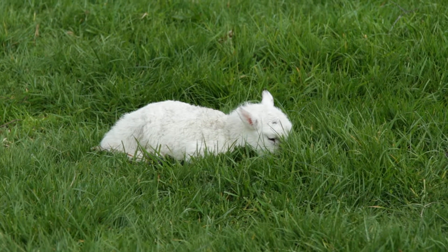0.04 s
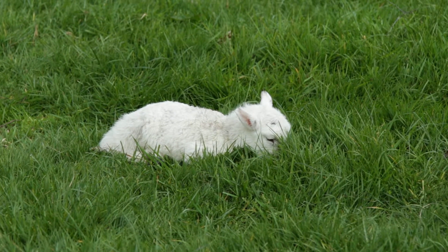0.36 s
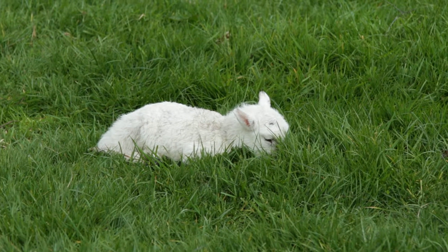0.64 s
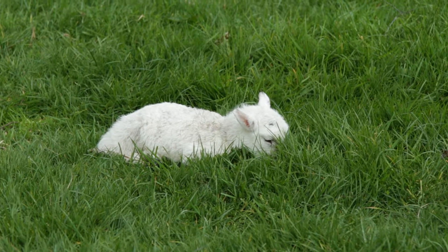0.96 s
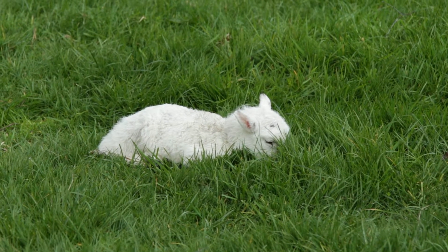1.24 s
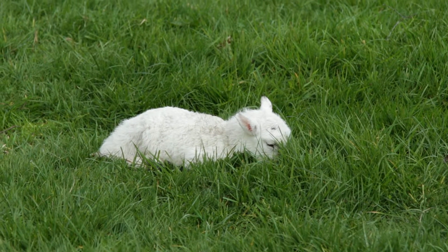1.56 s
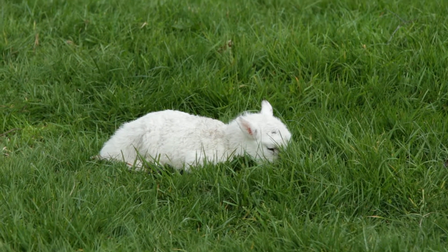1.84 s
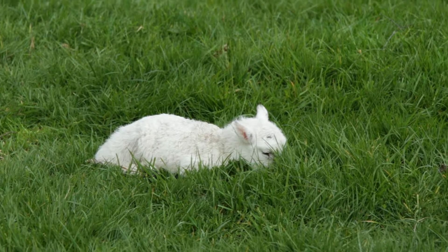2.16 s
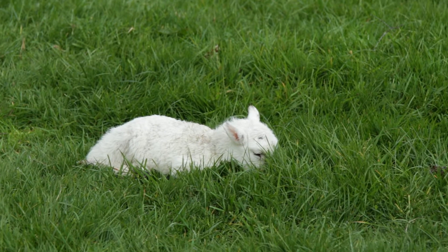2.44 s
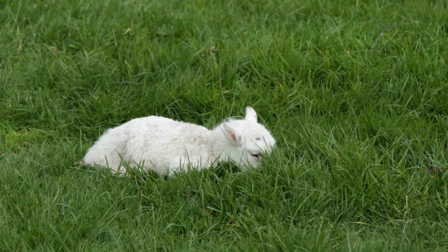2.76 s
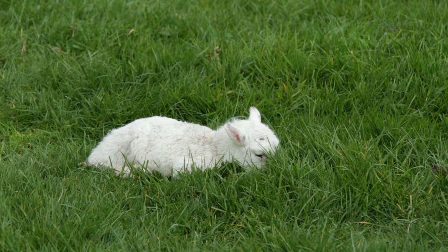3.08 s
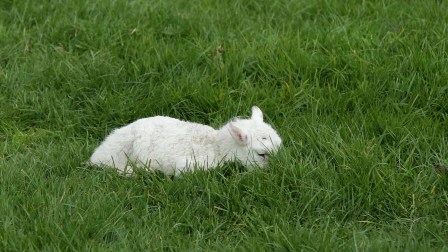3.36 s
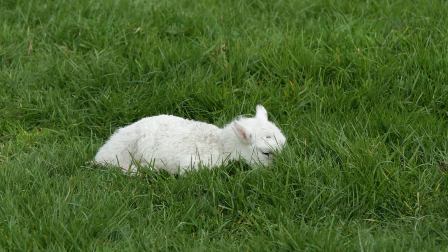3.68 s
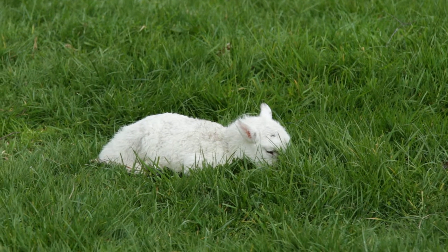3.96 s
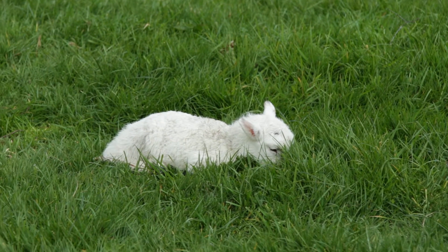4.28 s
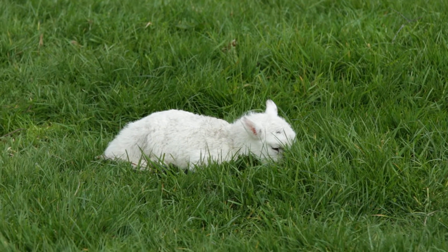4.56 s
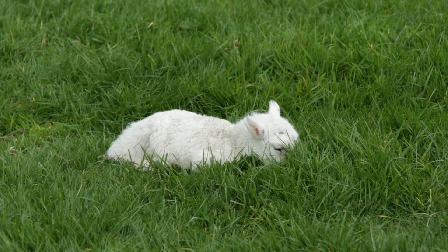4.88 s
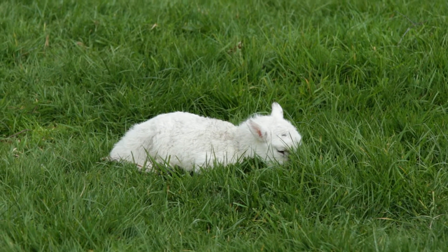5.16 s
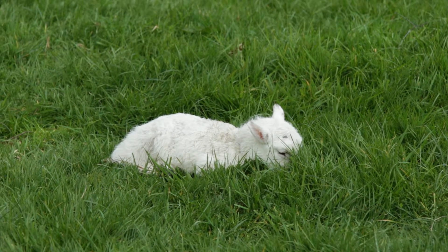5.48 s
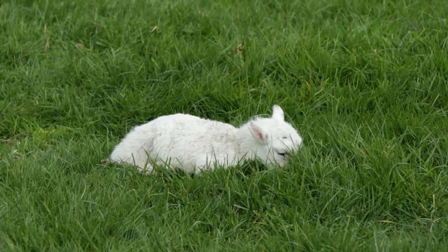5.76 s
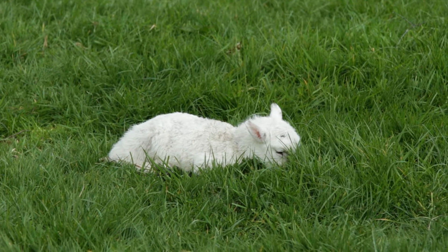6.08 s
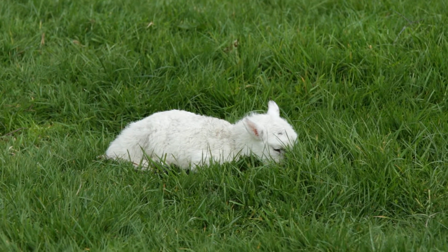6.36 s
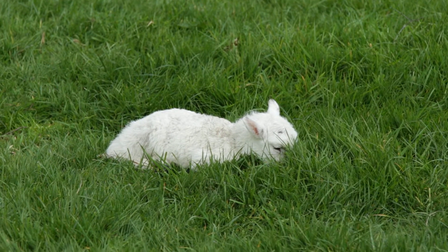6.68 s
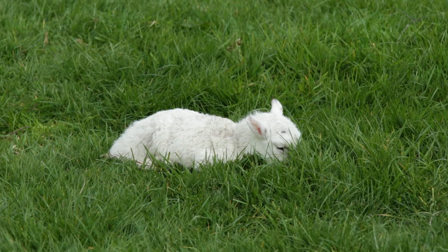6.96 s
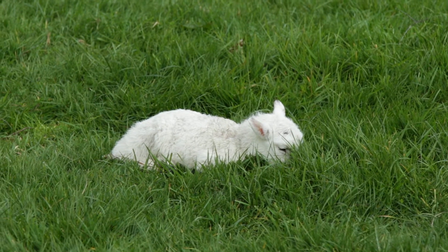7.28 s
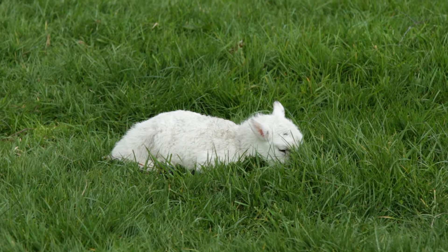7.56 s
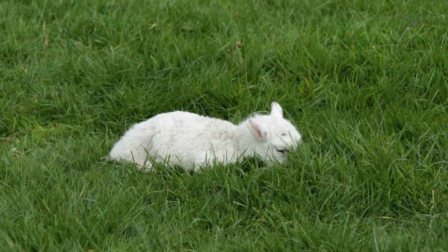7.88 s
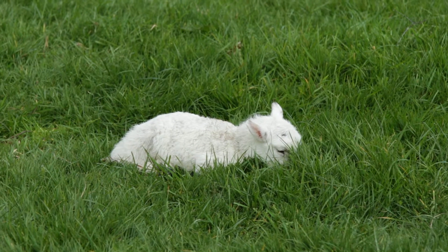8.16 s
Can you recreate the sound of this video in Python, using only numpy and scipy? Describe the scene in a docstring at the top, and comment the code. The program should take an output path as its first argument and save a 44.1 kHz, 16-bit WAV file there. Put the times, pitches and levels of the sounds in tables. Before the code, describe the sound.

A faint, steady outdoor rush lies under a quiet pasture throughout. Small birds chirp softly from about 0.5 to 1.5 seconds, and there is one soft knock at 1.1 seconds. From 1.3 to 2.1 seconds a nearby lamb gives a thin, rising call. A ewe close by overlaps its end with a loud, low, buzzing bleat from 1.8 to 2.9 seconds, starting as a hum, opening up, then falling with a quaver. A far lamb answers faintly around 2.8 seconds. A very distant sheep is barely audible around 4.5 seconds, and another far lamb calls from 4.7 to 5.4 seconds. The ewe gives her second loud, low bleat from 5.5 to 6.4 seconds, followed by a few small, high bird chirps until about 7.3 seconds. A last faint, trembling lamb call carries across the field from 7.6 to 8.3 seconds.

```python
"""A quiet pasture. A ewe close by gives two low, buzzing bleats; a lamb calls just before the first,
and other lambs answer from far across the field. Each of these voices is a source and a filter: the
vocal folds snap shut once a cycle, and every pulse rings in the resonances of the throat.
Small birds chirp in gliding tones, a very distant sheep carries as one partial, and there is one soft
knock. Ground and hedges scatter the sounds, and a faint outdoor rush lies under it all."""
import sys
import numpy as np
from scipy import signal
from scipy.fft import rfft, irfft, next_fast_len
from scipy.io import wavfile

SR = 44100
rng = np.random.default_rng(int(sys.argv[2]) if len(sys.argv) > 2 else 0)


def transcribe(u):
    """Save the signal u as a 16-bit wav file named by the first command-line argument.

    u: samples, shape (n,) or (channels, n), limited to [-1, 1]; the rate is SR.
    q: integer samples, one column per channel.
    """
    v = np.clip(np.atleast_2d(u).T, -1, 1)
    q = np.round(v * 32767).astype(np.int16)
    wavfile.write(sys.argv[1], SR, q)


N = 371763
TIME = np.arange(N) / SR
RING = 2048   # samples that one pulse rings for
PULSE_HZ = np.maximum(np.arange(RING // 2 + 1) * SR / RING, 1)
CONTROL_HZ = 1000   # control points per second of a call


def from_db(db):
    """Amplitude ratio: tenfold for every 20 dB."""
    return 10 ** (np.asarray(db) / 20)


def at_hz(spectrum, hz):
    """Interpolation of a spectrum on a log-frequency axis."""
    knots_hz, db = np.transpose(spectrum)
    return np.interp(np.log(np.maximum(hz, 1)), np.log(knots_hz), db)


def at_times(rows, times):
    """Linear interpolation of every column of a curve in time."""
    knots_s, *columns = np.transpose(rows)
    return [np.interp(times, knots_s, column) for column in columns]


def wander(times, count=80):
    """Slow random modulation with a spread of about 1."""
    return np.interp(times, np.linspace(0, N / SR, count), rng.standard_normal(count))


def bump(t, centre, half_width):
    """Gaussian window: a smooth rise to 1 and back."""
    return np.exp(-((t - centre) / half_width) ** 2)


def swell(t, attack_s, release_s):
    """Amplitude envelope in dB: attack, hold and release."""
    rise, fall = np.clip((t - t[0]) / attack_s, 0, 1), np.clip((t[-1] - t) / release_s, 0, 1)
    return 20 * np.log10(np.maximum(rise * fall, .02))


def noise(spectrum):
    """Spectral shaping of white noise, to an rms of 1."""
    size = next_fast_len(N)
    gain = from_db(at_hz(spectrum, np.fft.rfftfreq(size, 1 / SR)))
    coloured = irfft(rfft(rng.standard_normal(size)) * gain, size)[:N]
    return coloured / coloured.std()


# spectrum of the rush: (frequency [Hz], relative density [dB])
RUSH_SPECTRUM = [(20, -6.5), (36, 0), (60, -12.5), (82, 1), (105, -9), (165, -2), (205, -10), (450, -13.5),
                 (800, -13), (1600, -13), (2700, -19.5), (4500, -25), (8000, -35), (15000, -34.5)]


def outdoor_rush():
    """Stationary broadband noise, strongest in the bass."""
    return from_db(-69.5) * noise(RUSH_SPECTRUM)


def scatter(direct, t60, dull_hz):
    """Diffuse reflection from ground and hedges: an exponential tail, duller than the direct sound."""
    age = np.arange(SR) / SR
    tail = rng.standard_normal(SR) * from_db(-60 * age / t60) * (age > .004)
    lowpass = signal.butter(1, dull_hz, fs=SR, output="sos")
    return signal.fftconvolve(direct, signal.sosfilt(lowpass, tail / np.linalg.norm(tail)))[:N]


# a very distant sheep's strongest partial: (time [s], frequency [Hz], level [dB])
DISTANT_PARTIAL = [(4.2, 700, -95), (4.3, 711, -81), (4.5, 717, -91), (4.66, 715, -75.5), (4.75, 698, -98)]


def distant_sheep():
    """Attenuation with distance: only the strongest partial carries above the rush."""
    hz, db = at_times(DISTANT_PARTIAL, TIME)
    sounding = (TIME > DISTANT_PARTIAL[0][0]) & (TIME < DISTANT_PARTIAL[-1][0])
    return sounding * from_db(db) * np.sqrt(2) * np.sin(2 * np.pi * np.cumsum(hz * sounding) / SR)


def glides(notes, warble):
    """Frequency modulation: pure notes swell, bend through three pitches with a warble, and fade."""
    out = np.zeros(N)
    for start, length, start_hz, middle_hz, end_hz, db in notes:
        progress = np.linspace(0, 1, int(length * SR))
        hz = np.polyval(np.polyfit([0, .5, 1], [start_hz, middle_hz, end_hz], 2), progress)
        hz *= 1 + warble * np.interp(progress, np.linspace(0, 1, 20), rng.standard_normal(20))
        envelope = from_db(db) * np.sqrt(2) * np.sin(np.pi * progress)
        onset = int(start * SR)
        out[onset:onset + len(hz)] += envelope * np.sin(2 * np.pi * np.cumsum(hz) / SR)
    return out


# bird phrases: (start [s], notes [count], step [s], note length [s], first pitch [Hz],
# last pitch [Hz], glide within a note [fraction], first level [dB])
BIRD_PHRASES = [(0.427, 4, .1, 0.11, 8170, 7750, -.02, -87),
                (0.889, 4, .042, .04, 3440, 2600, -0.014, -74.5),
                (1.039, 2, .035, 0.034, 2800, 3050, .02, -71),
                (1.136, 4, .061, .014, 3660, 4000, 0.09, -71),
                (1.18, 2, .046, 0.058, 3060, 2930, -0.12, -66),
                (1.321, 2, .048, 0.08, 2590, 2400, -.06, -69.5),
                (3.335, 1, 0, 0.069, 7450, 7450, -.07, -80), (5.468, 1, 0, .078, 4250, 4250, 0.025, -77.5),
                (6.335, 2, .05, .035, 5380, 6100, 0.14, -69.5),
                (6.429, 2, .1, 0.042, 4640, 4450, .22, -68.5),
                (6.814, 4, .145, 0.036, 3750, 3600, .01, -84)]


def small_birds(crescendo_db=1.4):
    """Nearly pure tones: each phrase steps by equal intervals and grows louder note by note."""
    notes = []
    for start, count, step, length, first_hz, last_hz, glide, db in BIRD_PHRASES:
        for k, hz in enumerate(np.geomspace(first_hz, last_hz, round(count))):
            pitches = hz * (1 - glide / 2), hz, hz * (1 + glide / 2)
            notes.append((start + k * step, length, *pitches, db + crescendo_db * k))
    return glides(notes, warble=.035)


# spectrum of the knock's crack: (frequency [Hz], relative density [dB])
CRACK_SPECTRUM = [(100, -19), (1000, 8), (2500, 0), (3400, -8), (4600, -1), (6000, -15), (9000, -21),
                  (15000, -35)]


def knock(start_s=1.102, crack_t60=.03, thud_lag_s=.0033, thud_hz=215, thud_t60=.024):
    """Damped impulse response: a brief broadband crack, then a dull thud of a cycle or two."""
    age, thud_age = np.maximum(TIME - start_s, 0), np.maximum(TIME - start_s - thud_lag_s, 0)
    crack = noise(CRACK_SPECTRUM) * from_db(-53.5 - 60 * age / crack_t60)
    thud = np.sin(2 * np.pi * thud_hz * thud_age) * from_db(-44.5 - 60 * thud_age / thud_t60)
    return (age > 0) * (crack - thud)


def resonance(hz, width, db):
    """A formant: a bell-shaped peak in dB on a pulse's spectrum, or a notch if negative."""
    return db / (1 + (2 * (PULSE_HZ - hz) / width) ** 2)


def lips_shut(t, opens, time_constant_s):
    """Logistic step: 1 while the lips are shut, falling to 0 as they part."""
    return .5 - .5 * np.tanh((t - opens) / (2 * time_constant_s))


def fold_closures(contour, jitter, fraying=0):
    """Quasi-periodic vibration: the folds shut once a cycle, off by a random share of the period."""
    t = np.arange(contour[0][0], contour[-1][0], 1 / SR)
    pitch = at_times(contour, t)[0]
    cycles = np.cumsum(pitch) / SR
    times = np.interp(np.arange(int(cycles[-1]) + 1), cycles, t)
    spent = np.clip(np.linspace(-1, 1, len(times)), 0, 1)   # fraying grows over the second half
    return times + (jitter + fraying * spent) / pitch.mean() * rng.standard_normal(RING)[:len(times)]


def pulse_train(times, pitch, harmonic_db, rasp=0):
    """Source and filter: each closure's click and cycle of turbulence ring with that pulse's spectrum."""
    cepstrum = irfft(np.log(from_db(harmonic_db) * SR / pitch / np.sqrt(2)))
    cepstrum[:, 1:RING // 2] *= 2   # folding the cepstrum makes the ringing causal (minimum phase)
    cepstrum[:, RING // 2 + 1:] = 0
    starts, fractions = np.divmod(times * SR, 1)
    click = np.exp(-2j * np.pi * PULSE_HZ / SR * fractions[:, None])
    one_cycle = (np.arange(RING) < SR / pitch) * np.sqrt(pitch / SR)
    air = rng.standard_normal((RING // 4, RING))[:len(times)] * one_cycle
    pulses = irfft(np.exp(rfft(cepstrum)) * (click + rasp * rfft(air)))
    out = np.zeros(N + RING)
    for start, pulse in zip(starts.astype(int), pulses):
        out[start:start + RING] += pulse
    return out[:N]


def lamb_voice(contour, folds, throat, jitter, shimmer_db, dulling):
    """Formant filtering of fast pulses in a short throat; the weaker the call, the duller it is."""
    times = fold_closures(contour, jitter)
    pitch, level_db = at_times(contour, times[:, None])
    db = level_db + at_hz(folds, PULSE_HZ) + sum(resonance(*formant) for formant in throat)
    db += dulling * (level_db - level_db.max()) * np.log2(np.maximum(PULSE_HZ, 300) / 2000)
    db += shimmer_db * rng.standard_normal((RING, 1))[:len(times)]
    return pulse_train(times, pitch, db)


def far_contour(start, crest, end, start_hz, crest_hz, end_hz, roundness, level_db, tremble_hz):
    """Coupled pitch and level arch and tremble together: (time [s], pitch [Hz], level [dB])."""
    effort_db_per_octave, growth_db_per_s, hz_per_db = 41, 3, .77
    t = np.arange(start, end, 1 / CONTROL_HZ)
    before, after = np.maximum(crest - t, 0) / (crest - start), np.maximum(t - crest, 0) / (end - crest)
    pitch = crest_hz + (start_hz - crest_hz) * before ** roundness + (end_hz - crest_hz) * after ** 2
    tremble_db = 2 * np.cos(2 * np.pi * tremble_hz * (t - start)) + 1.3 * wander(t, count=240)
    db = level_db + effort_db_per_octave * np.log2(pitch / crest_hz) + growth_db_per_s * (t - crest)
    db += tremble_db + swell(t, attack_s=.058, release_s=.12)
    return np.column_stack([t, pitch + hz_per_db * tremble_db, db])


# far lambs' calls: (start [s], crest [s], end [s], start pitch [Hz], crest pitch [Hz], end pitch [Hz],
# roundness of the rise [exponent], base level [dB], tremble rate [Hz])
FAR_CALLS = [(2.697, 2.8, 3.06, 340.8, 342.4, 315, 1.4, -80, 8.1),
             (4.658, 4.942, 5.44, 321.6, 355.5, 322.4, 2.26, -75, 8.2),
             (7.591, 8.09, 8.34, 310.8, 341.8, 335.3, 1.15, -76, 9.98)]
# source spectrum of their vocal folds: (frequency [Hz], relative level [dB])
FAR_FOLDS = [(200, -41), (700, -17.5), (1100, -10), (2200, -25), (3100, -17), (5200, -14), (6500, -26.5),
             (9000, -30), (15000, -53)]
# formants of the earlier calls and of the last: (frequency [Hz], width [Hz], gain [dB])
EARLIER_THROAT = [(1380, 170, 14), (3100, 220, -8), (3650, 980, 12.5), (4850, 780, 7.5), (6640, 900, 7)]
LAST_THROAT = [(1020, 200, -8), (1355, 330, 21.5), (3480, 490, 11), (4630, 590, 13)]


def far_lambs():
    """Formants set timbre: one source spectrum through two throats gives two voices."""
    *earlier, last = [far_contour(*call) for call in FAR_CALLS]
    answers = sum(lamb_voice(call, FAR_FOLDS, EARLIER_THROAT, jitter=.0032, shimmer_db=1.3, dulling=.02)
                  for call in earlier)
    return answers + lamb_voice(last, FAR_FOLDS, LAST_THROAT, jitter=.0036, shimmer_db=.5, dulling=.02)


# the near lamb's rising fundamental: (time [s], pitch [Hz])
NEAR_PITCH = [(1.275, 265.9), (1.385, 286), (1.66, 305.3), (1.699, 322.8), (2.071, 337.3), (2.115, 314)]
# upward breaks of its voice: (time [s], half width [s], lift [Hz])
NEAR_BREAKS = [(1.459, 0.0122, 14.8), (1.516, .015, 20), (1.589, .028, 13), (1.63, .012, 17)]
# source spectrum of its vocal folds: (frequency [Hz], relative level [dB])
NEAR_FOLDS = [(150, -14), (320, -5), (650, -11), (980, -17), (1350, -10.5), (2300, -4.5), (3100, -16.5),
              (5900, -15.5), (6600, -22), (9000, -34), (15000, -53)]
# its formants: (frequency [Hz], width [Hz], gain [dB])
NEAR_THROAT = [(1930, 410, -14.5), (3655, 440, 19), (4160, 140, 9), (4970, 710, 20), (5870, 240, 5.5),
               (7500, 270, 11.5), (8500, 460, 9), (11500, 1000, 15)]


def near_lamb(quaver_hz=24.18, quaver_depth=.0069, effort_db_per_octave=45.5, fade_db_per_s=11.5):
    """Vocal effort ties level to pitch, which climbs, breaks upward a few times and quavers."""
    t = np.arange(NEAR_PITCH[0][0], NEAR_PITCH[-1][0], 1 / CONTROL_HZ)
    age = t - t[0]
    breaks = sum(lift * bump(t, centre, half_width) for centre, half_width, lift in NEAR_BREAKS)
    pitch = at_times(NEAR_PITCH, t)[0] + breaks
    pitch *= 1 + quaver_depth * np.sin(2 * np.pi * quaver_hz * age)
    db = -52 + effort_db_per_octave * np.log2(pitch / pitch.max()) - fade_db_per_s * age
    db -= 10.5 * lips_shut(t, opens=1.4, time_constant_s=.014)   # it hums until its mouth opens
    db += swell(t, attack_s=.05, release_s=.098)
    contour = np.column_stack([t, pitch, db])
    return lamb_voice(contour, NEAR_FOLDS, NEAR_THROAT, jitter=.0027, shimmer_db=.5, dulling=.24)


# grunts: (start [s], length [s], start pitch [Hz], middle pitch [Hz], end pitch [Hz], level [dB])
GRUNTS = [(1.19, 0.049, 240, 230, 225, -67.5), (1.825, 0.041, 170, 147, 125, -56.5),
          (5.537, 0.046, 187, 144, 135, -54.5)]


def grunts():
    """Voicing behind shut lips: a soft, low, falling tone as each close call starts."""
    return glides(GRUNTS, warble=.03)


def bleat_contour(pitch_curve, opens, level_db, shut_db, fade_db_per_s, closing_per_s, catch_db):
    """Articulation of a bleat: (time [s], pitch [Hz], level [dB], mouth [0-1], tilt [dB/octave])."""
    quaver_hz, quaver_depth, quaver_s = 22.18, .017, .37   # she quavers as her air runs out
    t = np.arange(pitch_curve[0][0], pitch_curve[-1][0], 1 / CONTROL_HZ)
    left, age = t[-1] - t, np.maximum(t - opens, 0)
    breathless = np.sqrt(np.clip(1 - left / quaver_s, 0, 1))
    quaver = quaver_depth * breathless * np.sin(2 * np.pi * quaver_hz * left)
    pitch = at_times(pitch_curve, t)[0] * (1 + quaver)
    effort = np.log2(pitch / 130)   # octaves; more effort makes her louder and brighter
    shut = lips_shut(t, opens, time_constant_s=.0069)
    # a catch in her throat starts the bleat, then the voice sinks briefly
    catch = catch_db * bump(t, t[0] + .012, .014) - 9.5 * bump(t, t[0] + .046, .019)
    db = level_db + 24 * effort - shut_db * shut - fade_db_per_s * age + catch
    db += swell(t, attack_s=.012, release_s=.037)
    ajar = .47 * (t - t[0]) / (opens - t[0])   # the lips creep apart during the hum
    mouth = np.clip(1 - (1 - ajar) * shut - closing_per_s * age, 0, 1)
    tilt = .66 + .83 * effort - 1.25 * age - 1.83 * shut
    return np.column_stack([t, pitch, db, mouth, tilt])


def slide(t, start, length, start_hz, end_hz, width, gain_db):
    """Formant transition: a peak or notch swells in, travels and fades out."""
    progress = np.clip((t - start) / length, 0, 1)
    strength = 2 * np.sqrt(progress * (1 - progress))
    return resonance(start_hz + (end_hz - start_hz) * progress, width, gain_db * strength)


# the ewe's formants before scaling, mouth shut and open:
# (shut [Hz], open [Hz], width [Hz], shut gain [dB], open gain [dB])
EWE_FORMANTS = [(584, 542, 160, -20, -11.5), (768, 644.5, 77, 5.5, 13), (1230, 1525, 262, -3.5, 19.5),
                (2160, 2275, 386, -8, 18), (2514, 2680, 205, 13.5, 6), (3730, 3060, 270, -12, 6),
                (4430, 4060, 330, 0.5, 7)]
# a nasal resonance sinks until the mouth opens; a peak and a valley climb as the bleat ends:
# (length [s], start [Hz], end [Hz], width [Hz], gain [dB])
NASAL_SLIDE = (0.1, 2680, 2350, 290, 2.6)
CLOSING_PEAK = (0.56, 2680, 2970, 140, 3.5)
CLOSING_VALLEY = (0.8, 2478, 2650, 260, -3.5)
# peaks and notches that her tongue drags down as it pulls back:
# (start [s], length [s], start frequency [Hz], width [Hz], gain [dB])
TONGUE_PULLS = [(2.037, 0.15, 4520, 278, 6.5), (2.07, 0.11, 6800, 2200, -4.5), (5.956, 0.37, 6860, 700, 7),
                (6.227, .2, 7500, 1600, 9.5)]


def ewe_throat(t, opens, mouth, upper_formants, waver=.013, tongue_drop=.2):
    """Vocal-tract response in dB, pulse by pulse: its resonances move with mouth and tongue."""
    scale = .94 + .069 * (t - opens)   # a shortening throat raises its resonances
    db = 0
    for shut_hz, open_hz, width, shut_db, open_db in EWE_FORMANTS:
        hz = shut_hz + (open_hz - shut_hz) * mouth
        db += resonance(hz * scale, width, shut_db + (open_db - shut_db) * mouth)
    for hz, width, gain_db in upper_formants:
        db += resonance(hz * scale * (1 + waver * wander(t)), width, gain_db)
    db += slide(t, opens - NASAL_SLIDE[0], *NASAL_SLIDE)
    closing = t[-1] - .38
    db += slide(t, closing, *CLOSING_PEAK) + slide(t, closing, *CLOSING_VALLEY)
    for start, length, hz, width, gain_db in TONGUE_PULLS:
        db += slide(t, start, length, hz, hz * (1 - tongue_drop), width, gain_db)
    return db


# her two bleats: (mouth opens [s], base level [dB], loss behind shut lips [dB], fading [dB/s],
# mouth closing [1/s], catch [dB])
FIRST_AND_SECOND = [(2.025, -47, 7, 4, 0.27, 4), (5.675, -46.6, 7.5, 3, 0.42, 7)]
# her fundamental in each bleat: (time [s], pitch [Hz])
FIRST_PITCH = [(1.845, 96.78), (1.93, 105), (2.0, 110.7), (2.055, 116.5), (2.088, 114.6), (2.125, 122.1),
               (2.2, 126.2), (2.32, 129.6), (2.42, 127.4), (2.5, 126.9), (2.575, 121), (2.635, 123.4),
               (2.7, 118.2), (2.77, 114.1), (2.815, 104.6), (2.865, 99)]
SECOND_PITCH = [(5.552, 99.6), (5.59, 95.2), (5.63, 108.6), (5.69, 117.9), (5.74, 121.4), (5.78, 120.2),
                (5.835, 129.2), (5.92, 130.7), (6.0, 127.3), (6.075, 124.2), (6.115, 126.9), (6.15, 124.4),
                (6.185, 119.6), (6.26, 116.6), (6.36, 112.8), (6.437, 98.6)]
# source spectrum of her vocal folds in each: (frequency [Hz], relative level [dB])
FIRST_FOLDS = [(60, -21), (125, -6.5), (260, -7.5), (400, -4), (800, -21.5), (1200, -20.5), (2600, -10),
               (3100, -18.5), (4400, -17), (5200, -34), (8500, -40.5), (9600, -49), (11500, -46.5),
               (15000, -64)]
SECOND_FOLDS = [(60, -24), (125, -3), (260, -7.5), (400, -6), (800, -20.5), (1200, -13.5), (2600, -9),
                (3100, -20), (4400, -22), (5200, -28), (7300, -47), (8500, -47.5), (11800, -54.5),
                (15000, -66)]
# her narrow upper formants in each, before scaling: (frequency [Hz], width [Hz], gain [dB])
FIRST_UPPER = [(2860, 67, 7), (3350, 180, 2.5), (4640, 170, 0), (5620, 300, 7.5), (6370, 370, 7),
               (7200, 300, 2), (8230, 310, 4), (11200, 900, -1)]
SECOND_UPPER = [(2810, 85, 3.2), (3330, 150, 4), (4550, 320, 5.6), (5450, 230, 1.4), (6350, 270, 1.8),
                (7440, 450, 11.6), (8850, 400, 2), (11900, 770, 3.7)]
# turbulent air between closures: (frequency [Hz], level relative to the pulse [dB])
RASP = [(300, -27), (1200, -13.5), (2500, -20.5), (4500, -12), (7000, -9.5), (13000, -1)]


def ewe(pitch_curve, gesture, folds, upper_formants, jitter, shimmer_db):
    """Source and filter: slow, sharp pulses and turbulent air buzz through a moving throat."""
    contour, opens = bleat_contour(pitch_curve, *gesture), gesture[0]
    times = fold_closures(contour, jitter, fraying=.0035)
    t = times[:, None]
    pitch, level_db, mouth, tilt = at_times(contour, t)
    db = level_db + at_hz(folds, PULSE_HZ) + tilt * np.log2(np.maximum(PULSE_HZ, 100) / 2000)
    db += ewe_throat(t, opens, mouth, upper_formants)
    db += shimmer_db * rng.standard_normal((RING, 1))[:len(times)]
    return pulse_train(times, pitch, db, rasp=from_db(at_hz(RASP, PULSE_HZ)))


def scene():
    """Superposition, alike in both channels: the farther a source, the greater its share of scatter."""
    first, second = FIRST_AND_SECOND
    bleats = ewe(FIRST_PITCH, first, FIRST_FOLDS, FIRST_UPPER, jitter=.0013, shimmer_db=0)
    bleats += ewe(SECOND_PITCH, second, SECOND_FOLDS, SECOND_UPPER, jitter=.0024, shimmer_db=.14)
    near = bleats + near_lamb() + grunts() + knock()
    far = far_lambs() + distant_sheep()
    birds = small_birds()
    diffuse = from_db(-27) * scatter(near, t60=1.0, dull_hz=5000)
    diffuse += from_db(-.5) * scatter(far, t60=.49, dull_hz=6900)
    diffuse += from_db(-4) * scatter(birds, t60=.67, dull_hz=9000)
    return np.tile(near + far + birds + diffuse + outdoor_rush(), (2, 1))


# spectrum of a faint low rumble: (frequency [Hz], relative density [dB])
RUMBLE_SPECTRUM = [(20, -5), (40, -10.5), (80, -11), (160, -18), (320, -19), (700, -20), (2000, -49)]


def record(dry):
    """Noise floor and band limit: each channel adds its own hiss and rumble; the top is cut steeply."""
    hiss = from_db(-75.5) * rng.standard_normal((2, N))
    rumble = from_db(-85) * np.array([noise(RUMBLE_SPECTRUM), noise(RUMBLE_SPECTRUM)])
    lowpass = signal.ellip(10, .1, 70, 15700, fs=SR, output="sos")
    return signal.sosfilt(lowpass, dry + hiss + rumble)


dry = scene()
out = record(dry)
transcribe(out)
```